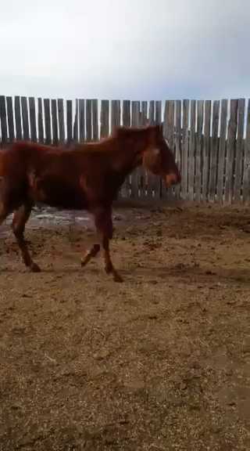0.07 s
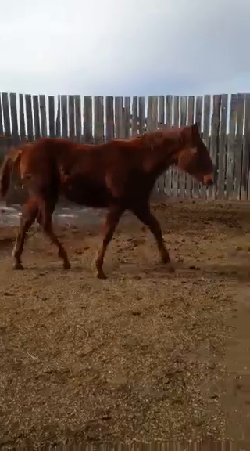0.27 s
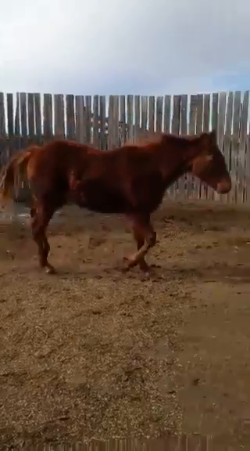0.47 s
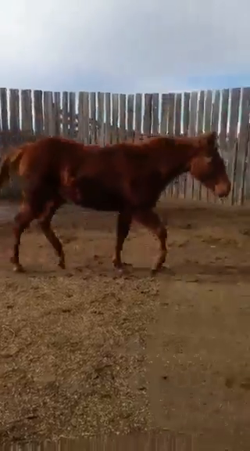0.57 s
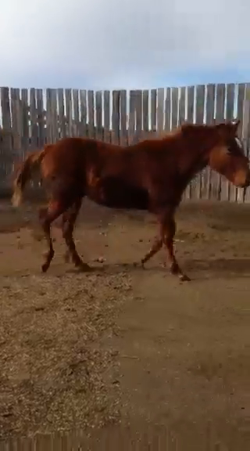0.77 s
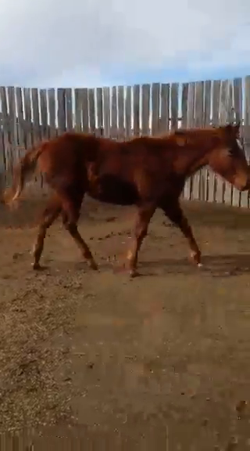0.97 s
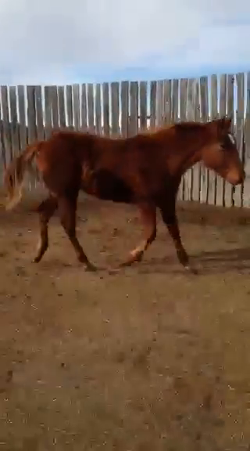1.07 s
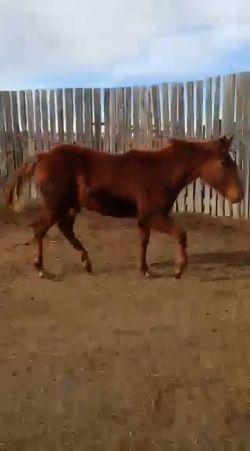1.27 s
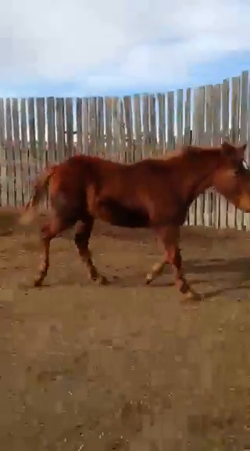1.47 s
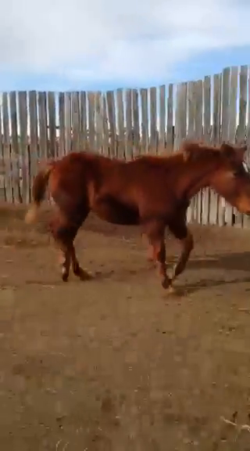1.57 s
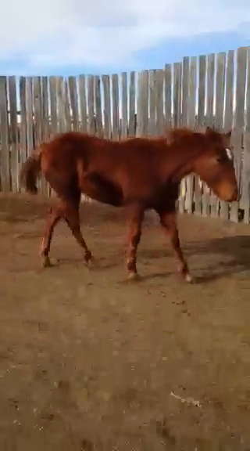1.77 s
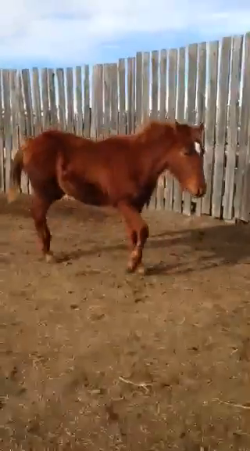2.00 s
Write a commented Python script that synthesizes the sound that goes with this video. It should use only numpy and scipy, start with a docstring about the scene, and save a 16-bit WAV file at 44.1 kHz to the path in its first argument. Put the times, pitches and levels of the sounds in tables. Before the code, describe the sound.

A horse whinnies outdoors. Silence until 0.13 s, then low uneven air rumble and a short, high, quavering whinny, sinking to a rasp by 0.55. Soft thuds near 0.5. From 0.9 to 1.65 a longer whinny rises, whistles, then breaks and falls hoarsely, over a cluster of heavy dull hoof thumps on dirt until 1.4. Another thud at 1.65; a third call starts at 1.95, cut off with a thud.

```python
"""After a moment of silence, air rumbles on the microphone and a horse gives a short quavering whinny.
Hooves thud on soft ground as it walks round a dirt pen; a long arched whinny and the start of a third follow.
Each whinny has two voices at once, a low tone from the vocal folds and a high whistle, both given their pitch
by a drawn curve; they break into a rasp as a call ends. Thuds are swelling sines with crushed dirt,
air and grit are filtered noise, and the plank fence adds a short tail by convolution."""
import sys
import numpy as np
from scipy import signal
from scipy.fft import rfft, irfft
from scipy.io import wavfile

SR = 44100
rng = np.random.default_rng(int(sys.argv[2]) if len(sys.argv) > 2 else 0)


def unload_audio(sound):
    """Save the sound as a 16-bit wav file, at the path given as the first command line argument."""
    columns = np.transpose(np.atleast_2d(sound))
    # keep every value between -1 and 1, then stretch to whole-number steps
    steps = np.round(np.clip(columns, -1, 1) * 32767)
    wavfile.write(sys.argv[1], SR, steps.astype(np.int16))


N = 89919
TIME = np.arange(N) / SR


def amp(db):
    """Logarithmic level: decibels become a linear gain."""
    return 10 ** (np.asarray(db) / 20)


def unit(x):
    """Power normalisation: scales a signal to rms 1."""
    return x / np.sqrt(np.mean(x ** 2) + 1e-20)


def curves(table):
    """Linear interpolation: the columns of a time table, one value per sample."""
    s, *columns = np.transpose(table)
    return [np.interp(TIME, s, column) for column in columns]


def read(points, hz):
    """Interpolation of a spectrum on a logarithmic frequency axis."""
    point_hz, value = np.transpose(points)
    return np.interp(np.log(hz + 1), np.log(point_hz), value)


def shape(x, spectrum):
    """Linear filtering: multiplies the spectrum of x by a gain curve in dB."""
    gain = amp(read(spectrum, np.fft.rfftfreq(N, 1 / SR)))
    return irfft(rfft(x) * gain, N)


def colour(x, spectrum):
    """Spectral shaping at constant power: filters x, then sets it to rms 1."""
    return unit(shape(x, spectrum))


def noise(spectrum):
    """Coloured noise: white noise filtered to a spectrum, at rms 1."""
    return colour(rng.standard_normal(N), spectrum)


def wander(hz):
    """Band-limited random motion: white noise halved in amplitude at hz and falling above, at rms 1."""
    f = np.fft.rfftfreq(N, 1 / SR)
    return unit(irfft(rfft(rng.standard_normal(N)) / (1 + (f / hz) ** 4), N))


def swell(start, rise_s):
    """Critically damped impulse: rises to 1 in the given time, then dies away."""
    u = np.maximum(TIME - start, 0) / rise_s
    return u * np.exp(1 - u)


def phase(hz):
    """Phase accumulation: the running integral of a frequency, in radians."""
    return 2 * np.pi * np.cumsum(hz) / SR


# uneven rumble before its trims: start_s, deep_level_db, upper_level_db
RUMBLE_LEVELS = [(.13, -45.5, -39.5), (.22, -50.5, -56.5), (.35, -47.5, -52.5), (.41, -66, -61.5),
                 (.47, -45.5, -47), (.56, -48.5, -44.5), (.82, -54.5, -58), (.91, -44.5, -39.5),
                 (.975, -45, -60.5), (1.06, -36, -41.5), (1.2, -41.5, -53), (1.35, -39.5, -47),
                 (1.45, -43, -51), (1.58, -50.5, -50.5), (1.66, -50.5, -40), (1.73, -76, -44.5),
                 (1.89, -62, -46.5), (1.96, -60.5, -39.5), (2.04, -37.5, -51)]
# spectra of the two rumble bands: frequency_hz, relative_level_db
DEEP_SPECTRUM = [(15, -34.5), (32, -18), (65, -1.5), (110, -5), (160, -12.5), (400, -61.5)]
UPPER_SPECTRUM = [(70, -7), (130, -2.5), (190, 2.5), (260, -6), (380, -14.5), (800, -45.5)]
# spectrum of the faint background: frequency_hz, relative_level_db
AIR_SPECTRUM = [(100, 4.5), (350, -2.5), (600, 4.5), (870, -2), (1100, 1), (2000, -5.5), (2800, -21),
                (4200, -15.5), (6000, -28.5), (8000, -41)]
# level of the thin high hiss: start_s, level_db
HISS_LEVELS = [(.13, -64.5), (.8, -76), (1.5, -64), (1.85, -66), (2.04, -69)]
# spectrum of the hiss, and of the scuffed grit below: frequency_hz, relative_level_db
GRIT_SPECTRUM = [(1500, -2), (3800, 0), (5500, 1.5), (8000, -7.5)]
DEEP_TRIM_DB, UPPER_TRIM_DB, AIR_DB = 2, -3, -56


def outdoors():
    """Level-modulated noise: uneven rumble of air on the microphone, a faint background and a thin hiss."""
    deep_db, upper_db = curves(RUMBLE_LEVELS)
    hiss_db, = curves(HISS_LEVELS)
    deep = amp(DEEP_TRIM_DB + deep_db) * noise(DEEP_SPECTRUM)
    upper = amp(UPPER_TRIM_DB + upper_db) * noise(UPPER_SPECTRUM)
    background = amp(AIR_DB) * noise(AIR_SPECTRUM)
    hiss = amp(hiss_db) * noise(GRIT_SPECTRUM)
    return deep + upper + background + hiss


# the calls, levels before trims: start_s, fold_pitch_hz, low_tone_level_db, treble_level_db
SHORT_CALL = [(0.128, 686.4, -44, -35), (.146, 701.1, -34, -35), (.162, 640.3, -42.5, -41.5),
              (.178, 647, -44, -38.5), (0.195, 702.1, -36.5, -34.5), (.234, 686.6, -37, -39),
              (.254, 604, -36.5, -39), (.277, 543.7, -42, -41.5), (0.292, 690.1, -37.5, -37.5),
              (.326, 687.8, -35, -36), (.342, 611.2, -42.5, -39.5), (0.376, 575.5, -37, -39),
              (0.401, 638.6, -35, -42.5), (0.419, 613, -46, -36.5), (0.455, 566, -33.5, -40.5),
              (.482, 549.2, -36, -47.5), (0.503, 603.3, -50, -60.5), (0.562, 562.3, -53.5, -54.5)]
LONG_CALL = [(.86, 551.5, -51.5, -69.5), (.905, 547.4, -48, -55), (.94, 568, -37, -46),
             (.96, 593.7, -40.5, -44), (.982, 623, -47.5, -52), (1.014, 648, -57, -45),
             (1.045, 657.6, -61, -42), (1.078, 669, -39.5, -42.5), (1.108, 691.5, -38, -37),
             (1.154, 696.5, -36, -39), (1.21, 720.6, -39, -37.5), (1.305, 710.5, -44.5, -37.5),
             (1.348, 687, -42.5, -42), (1.392, 684.3, -57, -46.5), (1.414, 597, -32.5, -42.5),
             (1.432, 585.5, -36.5, -39.5), (1.455, 653, -42, -40.5), (1.478, 618.5, -49, -40.5),
             (1.496, 558.5, -34.5, -43), (1.524, 624.3, -39.5, -44.5), (1.556, 537.2, -45.5, -51),
             (1.61, 560.2, -42.5, -51), (1.66, 520, -50, -62)]
THIRD_CALL = [(1.93, 540, -59, -66), (1.975, 520, -43, -54), (2.0, 570, -40, -45), (2.039, 605, -45, -47)]
# whistle pitch in each call: start_s, pitch_hz
SHORT_WHISTLE_PITCH = [(.135, 1770), (.165, 1680), (0.196, 1750), (.235, 1725), (.265, 1620), (0.299, 1745),
                       (0.344, 1640), (0.384, 1690), (0.404, 1585), (.47, 1560)]
LONG_WHISTLE_PITCH = [(0.905, 1180), (0.935, 1460), (0.975, 1580), (1.04, 1700), (1.198, 1830),
                      (1.37, 1765), (1.41, 1715), (1.62, 1680)]
THIRD_WHISTLE_PITCH = [(1.963, 1290), (2, 1440), (2.039, 1598)]
# voice quality; levels are against the treble, before trims:
# start_s, roughness (0-1), overtone_level_db, whistle_level_db, rasp_level_db
VOICE_QUALITY = [(.13, 0.21, -6.5, -9, -4.5), (.17, 0.34, -4, -8, -1), (.21, 0.12, 3.5, -2, -12),
                 (.27, .3, -1, -6.5, -5.5), (.31, 0.2, 4, -1, -13.5), (.36, 0.34, -2.5, -4.5, -4),
                 (.41, 0.18, -12, 1, -6), (.47, 0.55, 1.5, -16, -5.5), (.53, 1, -14, -30.5, 1),
                 (.87, 0.88, -10, -3, -1), (.95, .15, -7.5, 2.5, -10), (1.05, .1, -11.5, 2, -7),
                 (1.085, 0.1, -4, -1, -15.5), (1.108, 0.19, -2.5, -3.5, -11.5), (1.2, 0.08, -3, -4.5, -19),
                 (1.32, .08, 0, -6, -22), (1.385, 0, 6.5, 6, -9.5), (1.41, 0.42, -11.5, 3.5, -8.5),
                 (1.48, 0.43, -9, 0, -7), (1.54, 0.81, 0, -10, -0.5), (1.66, 1, -4, -5, 2),
                 (1.96, 0.77, -8.5, -3, -1), (2.0, 0.2, -3.5, 4.5, -16)]
# strength of the folds' overtones: frequency_hz, level_db
OVERTONE_SPECTRUM = [(1100, -19), (1420, -10.5), (1750, -3), (2150, -1.5), (2450, -15), (2850, -22),
                     (3550, -25.5), (4200, -18.5), (5200, -36), (8000, -16)]
# partials of the whistle, one row per multiple of its pitch, each with sidetones one fold pitch away:
# partial_level_db, lower_sidetone_level_db, upper_sidetone_level_db
WHISTLE_PARTIALS = [(0, -26.5, -4), (-19, -33, -39), (-18, -37, -23), (-19, -28, -29.5)]
# resonances of the mouth that the whistle glides through: frequency_hz, gain_db
MOUTH_RESONANCES = [(1280, -4), (1500, -0.5), (2900, 1.5), (3380, -6.5), (3650, 1.5), (4250, 1.5),
                    (4800, -2)]
# what the throat lets through of the low tone: frequency_hz, gain_db
LOW_TONE_PASSAGE = [(300, -32.5), (450, 3), (600, -2.5), (730, 4.5), (800, -3), (880, -28), (1100, -23.5),
                    (1400, -29)]
# throat colour of the rasp: frequency_hz, relative_level_db
THROAT_COLOUR = [(300, -33), (480, -13.5), (680, -5.5), (780, -15.5), (900, -13), (1080, -1), (1300, -24),
                 (1600, -1.5), (1900, -2), (2170, 4.5), (2500, -5.5), (2700, -14.5), (3100, -25),
                 (3500, -15), (4200, -18), (4700, -29), (6000, -30), (8000, -41.5)]
ATTACK_S, RELEASE_S = 0.004, 0.055  # time constants before and after a call
FOLD_JITTER, JITTER_HZ = 0.04, 103  # jitter as a fraction of pitch at full roughness, and its rate
WHISTLE_WAVER, WHISTLE_JITTER = .008, .008  # fractions of pitch: always present, added at full roughness
SHIMMER = 0.58  # random variation of each partial's strength, rms
FLUTTER_HZ, FLUTTER_DEPTH, FLUTTER_SPREAD = 110.03, 0.4, 0.2  # mean rate, depth at full roughness, rate spread
# each voice gains a twin one flutter rate away, at full strength from this roughness up
SPLIT_ROUGH, LOW_SPLIT_DB, WHISTLE_SPLIT_DB = 0.58, -10.5, 1
TIGHT_HZ, SIDETONE_DB_PER_HZ = 734, 0.06  # sidetones fade as the folds slacken below this pitch
LOW_TRIM_DB, OVERTONE_TRIM_DB, WHISTLE_TRIM_DB, RASP_TRIM_DB, SMEAR_DB = 0.52, -4.5, 0.06, 0.36, -1.34
SHORT_DULL_DB, LONG_DULL_DB, THIRD_DULL_DB = -11.5, -3, 0  # tilt of the whistle's partials, dB per octave
BRIGHTEN, USUAL_DB = 0.42, -44.5  # tilt, dB per octave, for each dB of treble above the usual level
ROUGH_DULL_DB = -6.5  # tilt at full roughness, dB per octave
BLUR_RAD = 0.6  # rms phase unrest added with each higher partial
RASP_SCATTER = 1.7  # how much the rasp's puffs differ in strength


def whinny(call, whistle_pitch, dull_db):
    """Biphonation: folds chop the whistle into sidetones, the air stream into a rasp; rough voices split."""
    fold_hz, low_db, treble_db = curves(call)
    whistle_hz, = curves(whistle_pitch)
    rough, overtone_db, whistle_db, rasp_db = curves(VOICE_QUALITY)
    rough = np.clip(rough, 0, 1)

    fold = phase(fold_hz * (1 + FOLD_JITTER * rough * wander(JITTER_HZ)))
    waver = WHISTLE_WAVER + WHISTLE_JITTER * rough
    high = phase(whistle_hz * (1 + waver * wander(JITTER_HZ)))
    beat = phase(FLUTTER_HZ * (1 + FLUTTER_SPREAD * wander(59.4)))
    flutter = 1 + FLUTTER_DEPTH * rough * np.cos(beat)
    split = np.minimum(rough / SPLIT_ROUGH, 1) ** 2

    # roughness trades the steady low tone for one with random amplitude and phase
    smear = wander(160) * np.cos(fold) + wander(190) * np.sin(fold)
    tone = np.sin(fold) + amp(LOW_SPLIT_DB) * split * np.sin(fold + beat)
    steady = np.sqrt(2 * (1 - rough ** 3)) * tone
    low = shape(steady + amp(SMEAR_DB) * rough ** 2 * smear, LOW_TONE_PASSAGE)

    overtones = np.zeros(N)
    for k in range(2, 9):
        strength = amp(read(OVERTONE_SPECTRUM, k * fold_hz)) * (1 + SHIMMER * wander(49))
        overtones += strength * np.sin(k * fold)

    tilt_db = dull_db + BRIGHTEN * (treble_db - USUAL_DB) + ROUGH_DULL_DB * rough
    slack_db = SIDETONE_DB_PER_HZ * np.minimum(fold_hz - TIGHT_HZ, 0)
    whistle = np.zeros(N)
    for k, row in enumerate(WHISTLE_PARTIALS, 1):
        for side, db in zip((0, -1, 1), row):  # the partial, its lower and its upper sidetone
            level_db = db + tilt_db * np.log2(k) + slack_db * abs(side)
            strength = amp(level_db) * (1 + SHIMMER * wander(31))
            blur = BLUR_RAD * (k - 1) * wander(120)
            whistle += strength * np.sin(k * high + side * fold + blur)
    twin = amp(WHISTLE_SPLIT_DB) * split * np.sin(high - beat)
    whistle = shape(whistle + twin, MOUTH_RESONANCES)

    # one puff of air per fold cycle
    pulses = np.diff(np.floor(fold / (2 * np.pi)), prepend=0)
    puffs = pulses * (1 + RASP_SCATTER * rng.standard_normal(N))
    rasp = colour(puffs * flutter, THROAT_COLOUR)

    voiced = amp(OVERTONE_TRIM_DB + overtone_db) * overtones + amp(WHISTLE_TRIM_DB + whistle_db) * whistle
    treble = voiced * flutter + amp(RASP_TRIM_DB + rasp_db) * rasp
    before_s = np.maximum(call[0][0] - TIME, 0)
    after_s = np.maximum(TIME - call[-1][0], 0)
    gate = np.exp(-before_s / ATTACK_S - after_s / RELEASE_S)
    return gate * (amp(LOW_TRIM_DB + low_db) * low + amp(treble_db) * treble)


# hoof thuds: start_s, level_db, pitch_hz, rise_s
HOOF_THUDS = [(.153, -40.5, 290, 0.0021), (0.481, -30, 148.4, 0.0045), (0.52, -39, 140, 0.0031),
              (0.53, -28.5, 115, 0.0031), (0.859, -35.5, 166, 0.0062), (0.9207, -25, 160, 0.0016),
              (0.939, -35, 150, 0.0079), (1.009, -22.5, 100, 0.0061), (1.055, -30.5, 89.4, 0.0058),
              (1.09, -22, 133.4, 0.0034), (1.108, -25, 194, 0.0016), (1.195, -30, 70.5, 0.0098),
              (1.226, -41, 90.4, 0.003), (1.3086, -21.5, 165, 0.002), (1.375, -25.5, 70, 0.006),
              (1.399, -27, 153, 0.0033), (1.647, -30.5, 180, 0.0046), (1.667, -35.5, 181.2, 0.0054),
              (2.016, -25, 140, 0.00076)]
# spectrum of crushed dirt: frequency_hz, relative_level_db
DIRT_SPECTRUM = [(100, 1), (220, 2.5), (420, 4.5), (700, -6.5), (2000, -47), (8000, -47)]
# grit scuffed by a hoof: start_s, level_db, rise_s
GRIT_SCUFFS = [(.435, -60, 0.0037), (0.579, -61, 0.0065), (0.925, -54, 0.0019)]
CRUNCH_DB, CRUNCH_RISE_S = -17.5, 0.0034  # level against the thud at CRUNCH_HZ
CRUNCH_HZ = 153  # thuds of higher pitch crush more dirt, lower ones less


def hooves():
    """Damped impact: a thud pushes soft ground and crushes dirt; now and then grit is scuffed."""
    dirt = noise(DIRT_SPECTRUM)
    thuds = np.zeros(N)
    for start, db, hz, rise_s in HOOF_THUDS:
        push = -swell(start, rise_s) * np.sin(2 * np.pi * hz * (TIME - start))
        crunch = amp(CRUNCH_DB) * (hz / CRUNCH_HZ) ** 2 * swell(start, CRUNCH_RISE_S) * dirt
        thuds += amp(db) * (push + crunch)
    scuff_level = sum(amp(db) * swell(start, rise_s) for start, db, rise_s in GRIT_SCUFFS)
    return thuds + noise(GRIT_SPECTRUM) * scuff_level


# decay of the fence's tail by 60 dB: frequency_hz, decay_s
FENCE_DECAY = [(100, 0.12), (600, 0.39), (2000, 0.69), (8000, 0.44)]
FENCE_DB, FENCE_DELAY_S, ECHOES_PER_S = -8, .022, 2500


def fence(x):
    """Scattering: planks return sparse random echoes that decay at a rate set by frequency."""
    echoes = rng.standard_normal(SR) * (rng.random(SR) < ECHOES_PER_S / SR)
    hz, t, z = signal.stft(echoes, SR, nperseg=256)
    decay = amp(-60 * t / read(FENCE_DECAY, hz)[:, None])
    tail = signal.istft(z * decay, SR, nperseg=256)[1]
    delay = np.zeros(int(FENCE_DELAY_S * SR))
    tail = np.concatenate([delay, tail / np.linalg.norm(tail)])
    return signal.fftconvolve(x, tail)[:N]


def scene():
    """Superposition: the horse, its reflection from the fence and the air outdoors add up."""
    air = outdoors()
    voice = (whinny(SHORT_CALL, SHORT_WHISTLE_PITCH, SHORT_DULL_DB)
             + whinny(LONG_CALL, LONG_WHISTLE_PITCH, LONG_DULL_DB)
             + whinny(THIRD_CALL, THIRD_WHISTLE_PITCH, THIRD_DULL_DB))
    horse = voice + hooves()
    return (horse + amp(FENCE_DB) * fence(horse) + air)[None]


START_S, EDGE_HZ = .13, 8100


def record(dry):
    """Band limiting: the microphone opens after a moment of silence, through a steep low-pass filter."""
    opened = dry * np.clip((TIME - START_S) / .001, 0, 1)  # opens over 1 ms
    lowpass = signal.firwin(401, EDGE_HZ, window=("kaiser", 8), fs=SR)
    return signal.oaconvolve(opened, lowpass[None], "same")


dry = scene()
out = record(dry)
unload_audio(out)
```